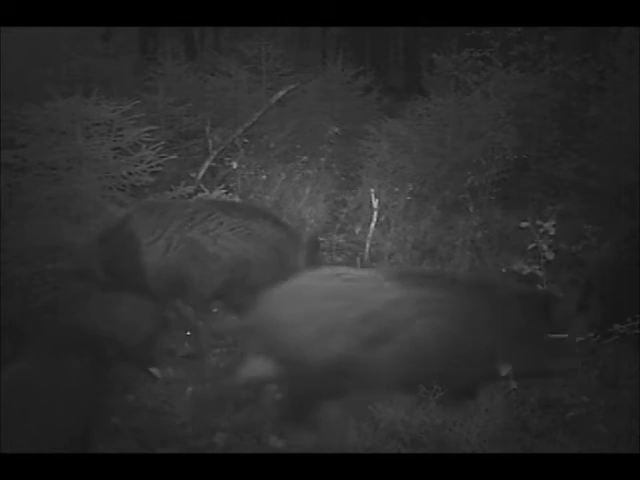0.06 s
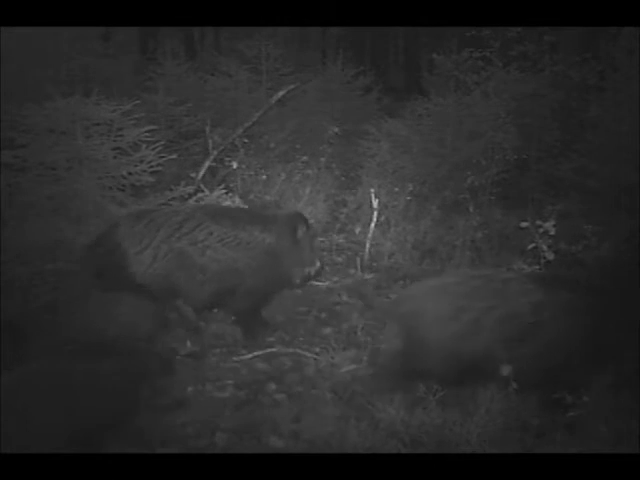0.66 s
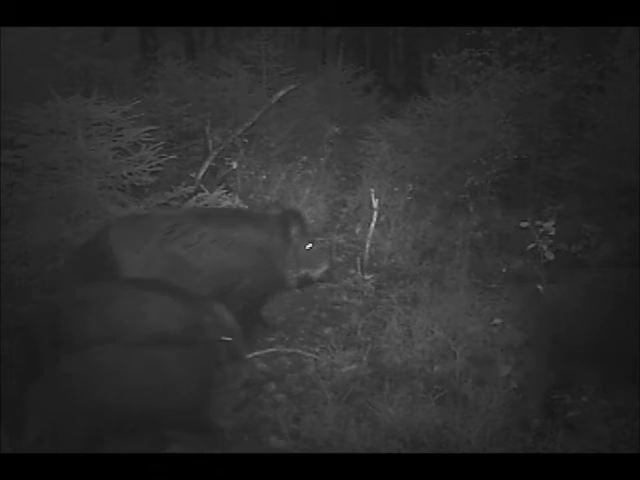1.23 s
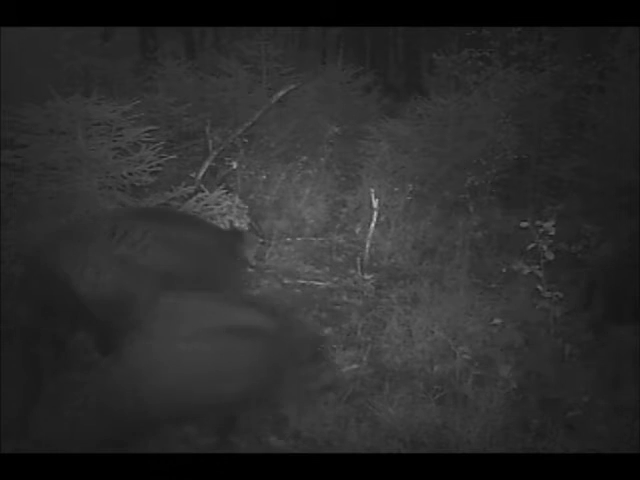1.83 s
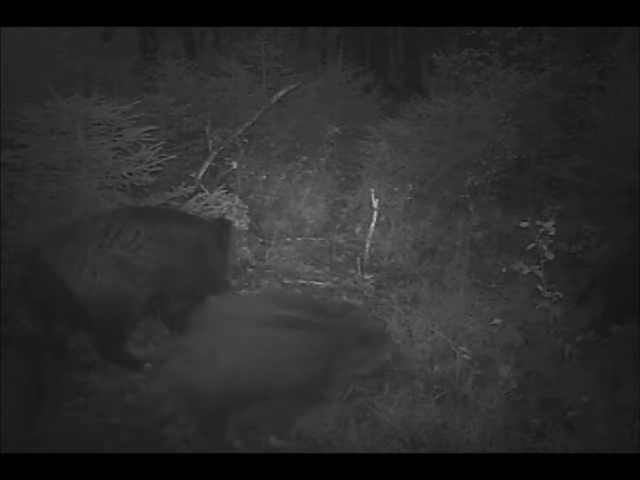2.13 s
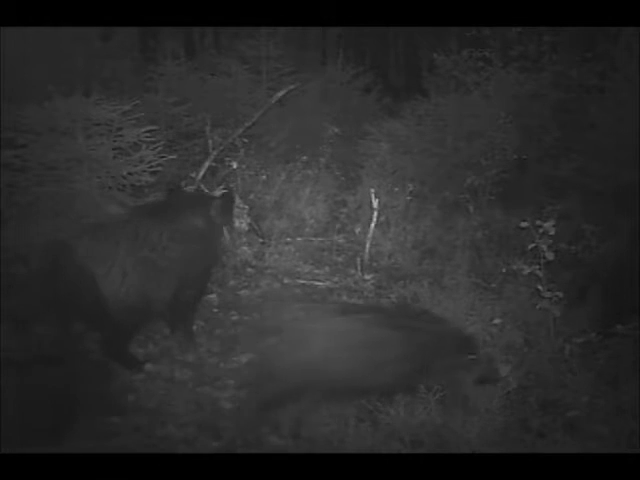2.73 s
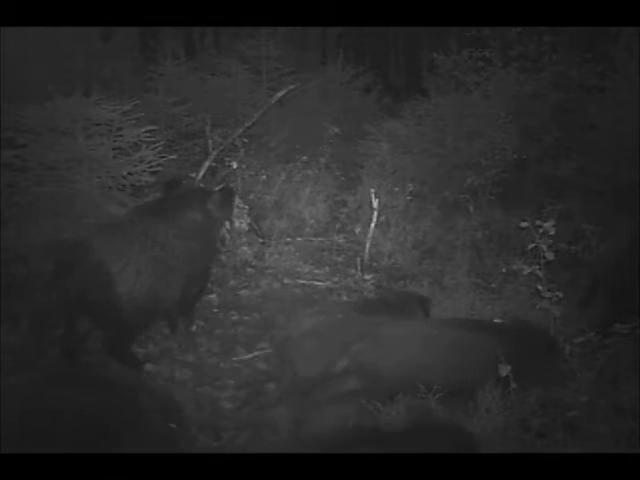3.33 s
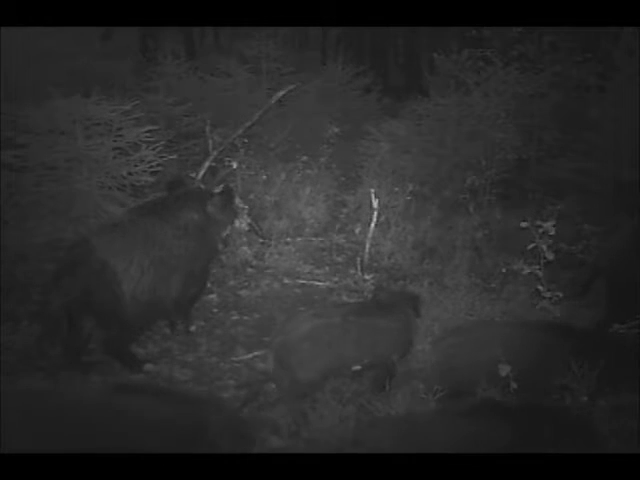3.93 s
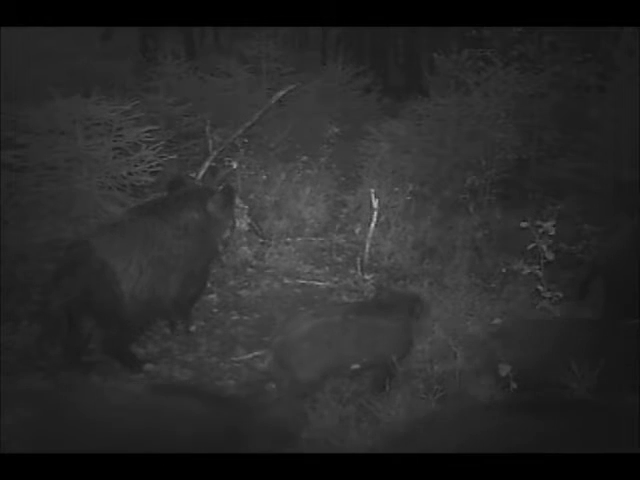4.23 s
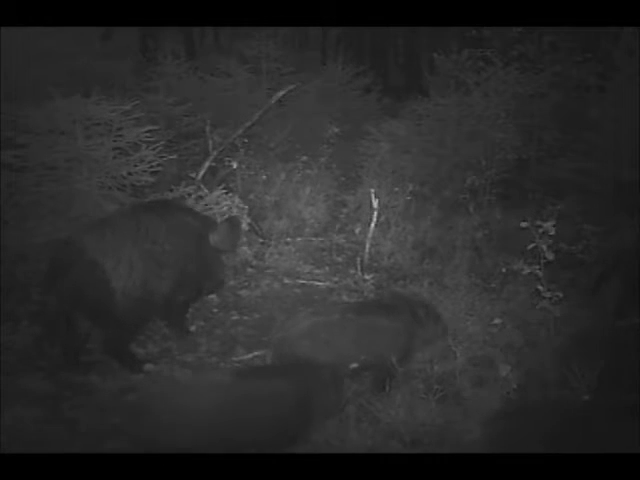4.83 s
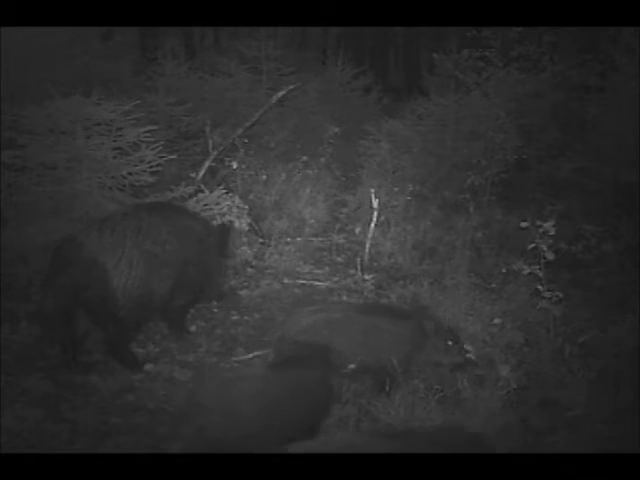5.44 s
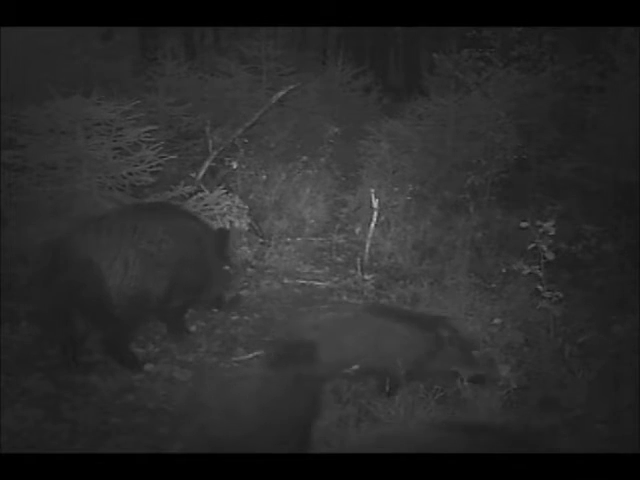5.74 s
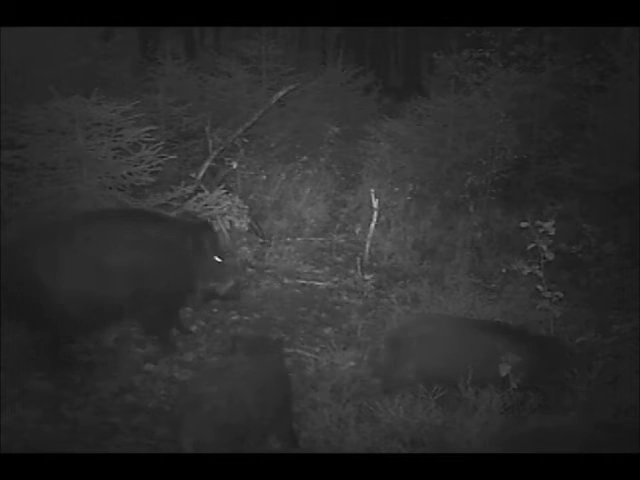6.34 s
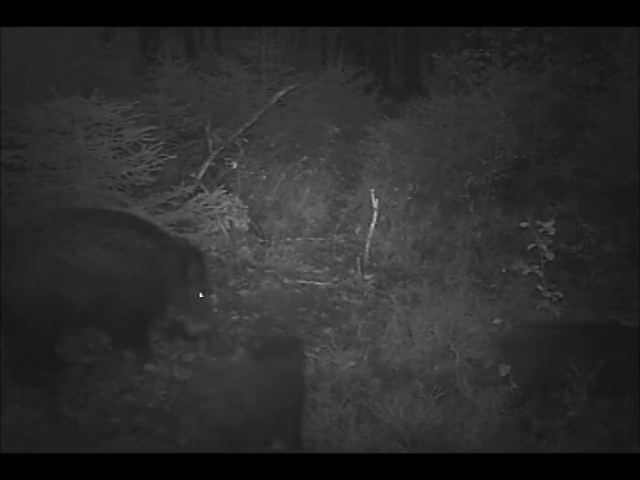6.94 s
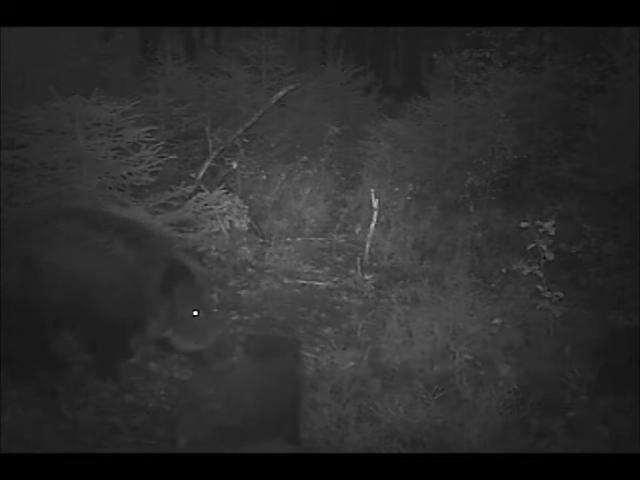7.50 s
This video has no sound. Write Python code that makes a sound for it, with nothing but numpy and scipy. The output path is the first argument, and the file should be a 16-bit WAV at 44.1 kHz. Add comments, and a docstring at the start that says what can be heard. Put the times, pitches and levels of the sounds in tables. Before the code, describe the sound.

A twig snaps and a boar snorts as a group of wild boars shuffles through dry leaf litter near the microphone. Short low grunts and sharp, airy sniffs alternate with a slight forest echo. Dull footfalls build midway, followed by a sharp twig crack, then more grunts, crunching steps and small clicks. The whole scene is quiet, with a constant high hiss behind it.

```python
"""Dry leaves rustle under a low grunt, a twig snaps, and a sharp snort follows: wild boars at night.
Their feet fracture the litter, break twigs and thud on the soil. Grunts are rough pulses from slack
vocal folds, filtered by the body's resonances; one boar sniffs in jets of air that hiss and whistle.
All is heard from a camera close by, whose small weatherproof case rings near 3 kHz and makes a hiss
of the rustle."""
import sys
import numpy as np
from scipy import signal
from scipy.fft import rfft, irfft
from scipy.io import wavfile
from scipy.ndimage import uniform_filter1d

SR = 44100
rng = np.random.default_rng(int(sys.argv[2]) if len(sys.argv) > 2 else 0)


def waveform_to_disk(signal):
    """Save audio, clipped to [-1, 1], as 16-bit WAV at the path in sys.argv[1]."""
    frames = np.transpose(np.atleast_2d(signal))
    scaled = np.clip(frames, -1, 1) * 32767
    samples = np.round(scaled).astype(np.int16)
    wavfile.write(sys.argv[1], SR, samples)


N = 338247
TIME = np.arange(N) / SR


def amp(db):
    """Amplitude ratio of a level in decibels."""
    return 10 ** (np.asarray(db) / 20)


def unit(x):
    """Normalisation to rms 1."""
    return x / np.sqrt(np.mean(x ** 2) + 1e-20)


def level_at(spectrum, hz):
    """Spectral level in dB, interpolated on a log-frequency axis."""
    f, db = np.transpose(spectrum)
    return np.interp(np.log(hz + 1), np.log(f), db)


def colour(x, db_at, size=8192):
    """Minimum-phase filter of gain db_at(hz): ringing follows the blow."""
    hz = abs(np.fft.fftfreq(size, 1 / SR))
    log_gain = np.log(amp(np.maximum(db_at(hz), -100)))
    taps = np.fft.ifft(np.exp(np.conj(signal.hilbert(log_gain)))).real
    return signal.fftconvolve(x, taps[:size // 2])[:len(x)]


def noise(spectrum):
    """Spectral shaping of white noise, at rms 1."""
    gain = amp(level_at(spectrum, np.fft.rfftfreq(N, 1 / SR)))
    return unit(irfft(rfft(rng.standard_normal(N)) * gain, N))


def drift(n, hz):
    """Random modulation: hz Gaussian values a second, joined by lines."""
    return np.interp(np.arange(n) * hz / SR, np.arange(N // 20), rng.standard_normal(N // 20))


def resonate(x, hz, width):
    """Heterodyne resonator at rms 1: shift hz down to zero, smooth twice, shift back."""
    carrier = np.exp(2j * np.pi * np.cumsum(hz * np.ones(len(x))) / SR)
    pole = np.exp(-np.pi * width / SR)
    return unit((carrier * signal.lfilter([1], [1, -2 * pole, pole * pole], x / carrier)).real)


def add(mix, start, sound):
    """Superposition of a sound from start, in seconds."""
    part = mix[max(round(start * SR), 0):][:len(sound)]
    part += sound[:len(part)]


def play(table, source):
    """Superposition of one event for each row."""
    out = np.zeros(N)
    for start, *row in table:
        add(out, start, source(*row))
    return out


# steady hiss of the night and the electronics: f/Hz, relative level/dB
FLOOR_SPECTRUM = [(30, -9.5), (170, -0.5), (400, -9), (1000, -13), (2300, -16.5), (3200, -3.5),
                  (4200, -14.5), (5500, -24.5), (11000, -20), (15500, -27)]


def noise_floor(db=-63.0):
    """Stationary noise lies beneath every other source."""
    return amp(db) * noise(FLOOR_SPECTRUM)


# the herd's weight on the ground: t/s, sway level/dB, thud level/dB
TREAD_LEVELS = [(0, -53, -57), (.4, -46.5, -59), (.65, -50, -63), (1.45, -53, -62), (2.15, -50, -64),
                (2.55, -43, -56.5), (2.9, -48, -63), (3.55, -44, -57), (3.75, -39, -49), (4.18, -46, -60.5),
                (4.38, -36.5, -49), (4.63, -41, -53), (4.92, -49.5, -63.5), (5.5, -49, -60.5),
                (5.9, -48, -63), (6.55, -44.5, -55), (7.25, -44.5, -60), (7.67, -47.5, -63)]
# sway of the camera mount and thud of the soil: f/Hz, relative level/dB
SWAY_SPECTRUM = [(5, -1), (15, 13.5), (25, 7.5), (50, 2.5), (65, -7.5), (100, -42), (1000, -93)]
THUD_SPECTRUM = [(35, -26), (60, -4), (88, -2), (115, -11.5), (150, -17.5), (260, -28), (600, -56),
                 (3000, -100)]


def ground(sway_gain_db=-1.5):
    """Forced vibration: heavy bodies treading near by sway the mount and thud on the soil."""
    def shake(spectrum, db):
        x = noise(spectrum)
        x /= np.sqrt(uniform_filter1d(x ** 2, SR // 4) + 1e-6)  # the tread alone sets the strength
        return x * amp(np.interp(TIME, times, db))
    times, sway_db, thud_db = np.transpose(TREAD_LEVELS)
    return shake(SWAY_SPECTRUM, sway_db + sway_gain_db) + shake(THUD_SPECTRUM, thud_db)


# heavy footfalls close by: t/s, peak level/dB, bounce f/Hz
HOOF_IMPACTS = [(3.26, -41, 70), (3.71, -35.5, 47), (3.825, -36, 41), (3.915, -36.5, 48.8),
                (4.35, -30.5, 65.4), (4.385, -40, 93), (4.48, -36, 72), (4.57, -35.5, 89),
                (5.17, -39, 24.6), (6.29, -35, 34.4), (6.445, -41, 41.5), (6.8, -35.5, 34.5)]


def footfall(db, hz, cycles=2.02):
    """Damped oscillation: soft soil bounces briefly under a hoof."""
    turns = np.arange(int(SR * cycles / hz)) * hz / SR
    bounce = np.sin(2 * np.pi * turns) * np.sin(np.pi * turns / cycles) ** 2 * np.exp(-turns)
    return amp(db) * bounce / abs(bounce).max()


def fractures(per_s=2300, size_db=3.0, decay_cycles=1.64, bands=24):
    """Shot noise: tiny leaf cracks arrive at random, each ringing briefly at its band's pitch."""
    out, t = np.zeros(N), np.arange(SR // 100) / SR
    for hz in np.geomspace(900, 13000, bands):
        onsets = rng.integers(0, N, int(per_s * N / SR / bands))
        sizes = amp(size_db * np.minimum(rng.exponential(1, len(onsets)), 4))
        ring = np.sin(2 * np.pi * hz * t) * np.exp(-hz * t / decay_cycles)
        cracks = signal.oaconvolve(np.bincount(onsets, sizes, N), ring)[:N]
        out += np.sqrt(hz) * unit(cracks)  # equal power per Hz
    return unit(out)


# single steps that crush the leaves: t/s, duration/s, peak level/dB
LEAF_STEPS = [(.01, 0.058, -52.5), (.17, 0.16, -50.5), (.39, 0.083, -55), (.68, 0.12, -54),
              (1.17, 0.16, -50.5), (1.74, 0.096, -59), (1.92, 0.11, -66), (2.11, 0.16, -56),
              (2.33, 0.14, -53), (2.51, 0.053, -57), (2.72, 0.18, -54.5), (2.95, 0.15, -56),
              (3.12, 0.084, -52.5), (3.33, 0.11, -53.5), (3.44, 0.12, -50.5), (3.65, 0.18, -61.5),
              (4.36, 0.11, -53), (5.48, 0.078, -51.5), (5.7, .08, -59.5), (5.86, .23, -56),
              (6.2, 0.082, -53), (6.4, 0.072, -59), (6.58, .2, -54.5), (6.945, .07, -53.5),
              (7.49, 0.11, -59)]


def step_power(length, db, press_share=0.26):
    """Power envelope of a step: it swells as the hoof presses and dies as the leaves settle."""
    progress = np.linspace(0, 1, int(length * SR))
    return amp(db) ** 2 * np.interp(progress, [0, press_share, 1], [0, 1, 0]) ** 0.83


# rustle of dry leaves: f/Hz, relative level/dB
LEAF_SPECTRUM = [(650, -11.5), (950, -19.5), (1300, -15.5), (2350, -17.5), (2850, 0.5), (3350, 0),
                 (4100, -1), (4650, -18), (6700, -20.5), (7600, -21), (9800, -16), (11100, -9),
                 (13000, -19.5), (15500, -34)]
# dryness of the leaves underfoot: t/s, treble gain/dB
LEAF_DRYNESS = [(0, -3), (1, -4.5), (1.5, -7), (2.2, -4), (2.8, -6), (3.4, -3.5), (3.8, -6.5), (4.5, -4.5),
                (5.2, -3.5), (5.6, -4.5), (6.5, -2.5), (7.67, -3)]
# how busily the herd stirs the litter: t/s, level/dB
STIR_LEVELS = [(0, -61), (.55, -62.5), (1.1, -60), (1.65, -57.5), (2.1, -54.5), (2.7, -57.5), (3.1, -60),
               (3.4, -62.5), (3.8, -57), (4.3, -57.5), (4.8, -58), (5.2, -53.5), (5.65, -61), (6.1, -54),
               (6.85, -55.5), (7.08, -60.5), (7.35, -62.5), (7.67, -64.5)]


def litter(crackle_share=0.38, clump_db=2.08, fizz_db=2.0, lull_db=1.0):
    """Incoherent sources add in power: leaf fractures, bristles brushing plants, and single steps."""
    drive = np.sqrt(crackle_share) * fractures() + np.sqrt(1 - crackle_share) * rng.standard_normal(N)
    drive *= amp(clump_db * drift(N, 70))
    rustle = unit(colour(drive, lambda hz: level_at(LEAF_SPECTRUM, hz)))
    body = signal.sosfiltfilt(signal.butter(2, 6000, fs=SR, output="sos"), rustle)
    crispness = amp(np.interp(TIME, *np.transpose(LEAF_DRYNESS)) + fizz_db * drift(N, 45))
    stir = amp(np.interp(TIME, *np.transpose(STIR_LEVELS)) + lull_db * drift(N, 18))
    return (body + (rustle - body) * crispness) * np.sqrt(stir ** 2 + play(LEAF_STEPS, step_power))


def stalks(per_s=14, above_stir_db=7.5, spread_db=2.5, low_hz=2800, high_hz=4200, decay_s=.0011):
    """Free decay: stalks and needles tick at random, as loud as the herd is busy."""
    out, t = np.zeros(N), np.arange(SR // 100) / SR
    for when, size, pitch in rng.random((int(per_s * N / SR), 3)):
        start, hz = when * N / SR, low_hz + pitch * (high_hz - low_hz)
        db = np.interp(start, *np.transpose(STIR_LEVELS)) + above_stir_db
        db -= spread_db * np.log(max(size, .05))
        add(out, start, amp(db) * np.sin(2 * np.pi * hz * t) * np.exp(-t / decay_s))
    return out


# twigs snapping: t/s, relative peak level/dB, ring f/Hz, relative crack level/dB
TWIG_SNAPS = [(0.2358, -31.5, 3360, -15), (0.7941, -42.5, 2820, -19), (1.3724, -38, 2960, -29),
              (1.773, -38, 3170, -18), (1.932, -40.5, 3390, -26), (2.579, -48, 3190, -26),
              (2.8805, -37.5, 3440, -30), (3.027, -41, 2750, -22), (3.2755, -41, 2990, -21),
              (3.5588, -43.5, 4030, -28), (3.612, -45.5, 2940, -32), (3.6546, -44, 3420, -27),
              (5.1435, -31, 3300, -3), (5.5699, -41.5, 3250, -33), (6.3771, -37.5, 3460, -30),
              (6.4887, -32.5, 3160, -14), (6.7351, -40, 3410, -17), (6.909, -41, 3800, -21),
              (6.9558, -36.5, 3420, -27), (6.996, -39.5, 3780, -20)]


def twigs(gain_db=1.0, crack_gain_db=16.0, tear_s=0.005):
    """Brittle fracture: a twig cracks, its fibres tear briefly and it rings at its own pitch."""
    out, t = np.zeros(N), np.arange(SR // 20) / SR
    impulse = t == 0
    for start, db, ring_hz, crack_db in TWIG_SNAPS:
        tear = rng.standard_normal(len(t)) * np.exp(-t / tear_s)
        # a hard crack has a flatter spectrum than the rustle
        crack = unit(colour(impulse + .1 * tear, lambda hz: 0.75 * level_at(LEAF_SPECTRUM, hz)))
        ring = resonate(impulse + .058 * tear, ring_hz, width=600)
        snap = ring + amp(crack_db + crack_gain_db) * crack
        add(out, start, amp(db + gain_db) * snap / abs(snap).max())
    return out


def forest(x, wet_db=-11, t60=0.46, gap_s=.004, echoes_per_s=2000):
    """Scattering from the ground and nearby trunks adds a short, thin echo."""
    t = np.arange(SR // 2) / SR
    taps = rng.standard_normal(len(t)) * (rng.random(len(t)) < echoes_per_s / SR)
    taps *= (t > gap_s) * amp(-60 * t / t60)
    return x + amp(wet_db) * signal.fftconvolve(x, taps / np.linalg.norm(taps))[:N]


# grunts: t/s, duration/s, level/dB, pulse f/Hz, throat f/Hz, mouth gain/dB, snout gain/dB, roughness
GRUNT_CALLS = [ (0, 0.19, -62, 71.7, 210, -21, -30, 0.28), (.15, 0.093, -56.5, 62.3, 218, -10, -26, 0.46),
               (.68, .22, -59.5, 70.24, 289, -14, -10.5, 0.57),
               (1.205, 0.07, -53.5, 79.4, 237, -5, -14, 0.67), (1.24, 0.1, -52, 72, 287, -3, -26, .3),
               (1.385, .16, -63, 72, 294, -13, -20, 0.8), (1.8, .16, -64, 66.2, 261, -12, -9, .4),
               (2.15, 0.085, -61, 69.2, 197, -11, -11, 0.46), (2.28, 0.075, -60, 52.3, 250, -12, -4, .35),
               (2.52, 0.16, -67, 69.9, 298, -5, -10, .6), (3.56, .12, -56.5, 47.8, 276, -8.5, -4.5, 0.07),
               (3.625, 0.13, -56, 95.1, 283, -14, -15, .07), (4.93, 0.073, -62, 65.2, 205, -14, -9, 0.15),
               (5.21, 0.19, -59, 62.26, 224, -14, -17, .45), (5.68, .14, -62.5, 62.5, 197, -18, -25, .4),
               (5.84, .15, -56, 58.04, 250, -23, -19, 0.34), (6.0, .13, -59.5, 68, 255, -24, -15, 0.44),
               (6.49, 0.093, -49.5, 56.2, 291, -11.5, -15, .45), (6.8, .13, -66, 67.8, 292, -7, -6, 0.53),
               (7.125, 0.09, -55, 66.8, 218, -11, -22, 0.3),
               (7.235, 0.062, -61.5, 70.7, 243, -10, -11, 0.24),
               (7.505, .13, -58.5, 65.4, 259, -16, -23, 0.44)]


def grunt(length, db, pulse_hz, throat_hz, mouth_db, snout_db, rough,
          jitter=.3, shimmer=.83, puff_s=.0027, sag=.14):
    """Source and filter: uneven flaps of slack folds and their puffs of air ring the body's resonances."""
    n = int(length * SR)
    fall = np.exp(sag * np.linspace(.5, -.5, n))  # pitch, throat and mouth sink as the effort fades
    turns = .5 + np.cumsum(pulse_hz * fall * np.exp(jitter * rough * drift(n, pulse_hz))) / SR
    flaps = np.diff(np.floor(turns), prepend=0) * np.exp(shimmer * rough * drift(n, pulse_hz))
    puffs = (0.26 + np.exp(-(turns % 1) / pulse_hz / puff_s)) * rng.standard_normal(N)[:n]
    drive = (1 - rough) * unit(flaps) + rough * unit(puffs)
    mouth_hz = 560 * (250 / throat_hz) ** 1.54  # the tongue lowers one resonance as it raises the other
    throat = resonate(drive, throat_hz * fall, width=140)
    chest = amp(-8) * resonate(drive, hz=132.6, width=18)
    mouth = amp(mouth_db) * resonate(drive, mouth_hz * fall, width=112)
    snout = amp(snout_db) * resonate(drive, hz=1310, width=320)
    flanks = amp(-5) * resonate(drive, hz=81, width=30)
    return amp(db) * (unit(throat + chest + mouth + snout) + flanks) * signal.windows.tukey(n, 0.48)


# broad hiss of the nose: f/Hz, relative level/dB
NOSE_SPECTRUM = [(250, -8.5), (750, -6.5), (950, -14), (1250, -1), (1750, -5.5), (2300, 1.5), (3400, 2),
                 (4150, 0.5), (4700, -22.5), (5900, -18), (6750, -10), (7400, -17.5), (11000, -15.5),
                 (15500, -24)]
# resonances of the nasal passage: f/Hz, bandwidth/Hz
NASAL_MODES = [(1340, 340), (2230, 144), (2840, 190), (3450, 170), (4110, 280)]
# snorts: t/s, duration/s, hiss level/dB, whistle level/dB, jet f/Hz, lowest mode's level/dB
SNORT_BLASTS = [ (.28, .11, -48.5, -51.5, 2600, -69), (.812, .11, -47.5, -50.5, 3100, -55.5),
                (1.375, 0.099, -47, -45.5, 2770, -59), (1.46, 0.074, -66, -55, 2850, -82),
                (2.0, .12, -49, -57.5, 2150, -63), (2.605, .11, -51, -56, 2320, -60.5),
                (3.255, .1, -48, -53.5, 2060, -68), (3.93, .12, -52, -50.5, 3780, -59),
                (4.65, 0.11, -48.5, -47.5, 3770, -59.5), (7.505, 0.089, -61, -59.5, 2810, -69)]


def snort(length, hiss_db, whistle_db, jet_hz, hum_db,
          flutter_db=2, rise=.086, ripple_db=3, ripple_hz=240, jet_db=2, jet_octaves=.22):
    """Turbulent excitation: a fluttering jet hisses and blows nasal modes near its pitch and octave."""
    def near_jet(hz):
        return np.exp(-.5 * (np.log2((hz + 1) / jet_hz) / jet_octaves) ** 2)

    def nose_db(hz):
        ripple = ripple_db * np.interp(hz / ripple_hz, np.arange(len(folds)), folds)
        return level_at(NOSE_SPECTRUM, hz) + ripple * np.minimum(hz / 6000, 1) + jet_db * near_jet(hz)

    n = int(length * SR)
    air = rng.standard_normal((len(NASAL_MODES) + 1, SR))[:, :n]
    folds = rng.standard_normal(200)  # wet nasal folds colour the treble anew each time
    hiss = unit(colour(air[-1], nose_db) * amp(flutter_db * drift(n, 256)))
    mode_hz = np.transpose(NASAL_MODES)[0]
    gains = amp(whistle_db) * (near_jet(mode_hz) + near_jet(mode_hz / 2))
    gains[0] = amp(hum_db)
    glide = np.exp(rise * np.linspace(-.65, .35, n))
    narrowing = amp(np.clip(hiss_db - whistle_db, -6, 0))  # a jet that locks on whistles more purely
    whistle = sum(gain * resonate(jet, hz * glide, width * narrowing)
                  for jet, gain, (hz, width) in zip(air, gains, NASAL_MODES))
    swell = np.sin(np.pi * np.arange(n) / n) ** 1.22
    return (amp(hiss_db) * hiss + whistle) * swell


def scene():
    """Superposition at one microphone: voices among the trees, litter and ground."""
    voices = forest(play(GRUNT_CALLS, grunt) + play(SNORT_BLASTS, snort))
    return (voices + litter() + twigs() + stalks() + ground() + play(HOOF_IMPACTS, footfall))[None]


# narrow resonances of the camera case: f/Hz, bandwidth/Hz, gain/dB
CASE_MODES = [(1293, 83, 3.5), (1954, 29, 7), (2190, 34, 2), (3420, 82, 2.5), (4950, 38, 8),
              (6750, 260, 6.5)]


def record(dry, whine_hz=15625, whine_db=-86.5, cutoff_hz=15740):
    """Case resonances colour scene and noise floor; the electronics add a whine and limit the band."""
    def case_db(hz):
        return sum(db / (1 + (2 * (hz - f) / width) ** 2) for f, width, db in CASE_MODES)
    cased = colour(dry[0] + noise_floor(), case_db)
    whine = amp(whine_db) * np.sqrt(2) * np.sin(2 * np.pi * whine_hz * TIME)
    low_pass = signal.firwin(2047, cutoff_hz, window=("kaiser", 9), fs=SR)
    return signal.oaconvolve(cased + whine, low_pass, "same")[None]


dry = scene()
out = record(dry)
waveform_to_disk(out)
```